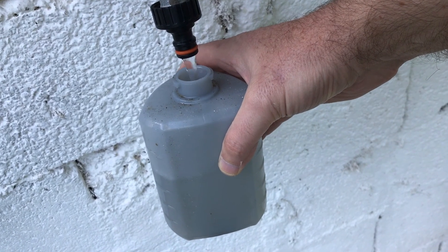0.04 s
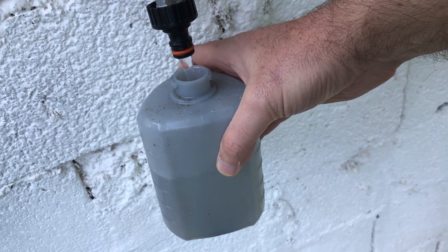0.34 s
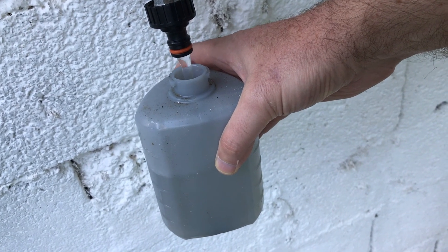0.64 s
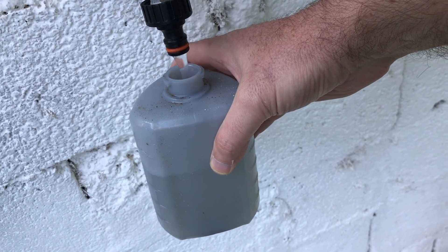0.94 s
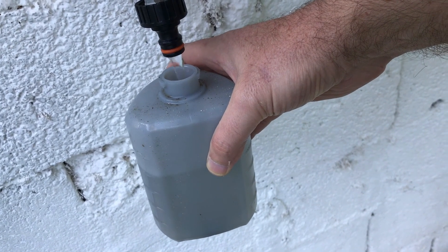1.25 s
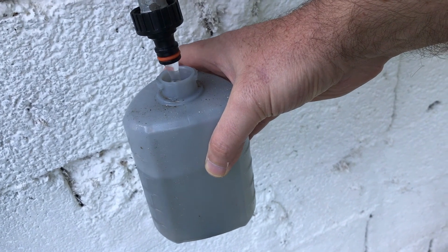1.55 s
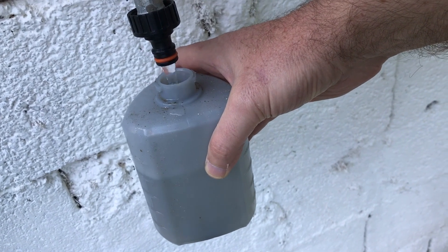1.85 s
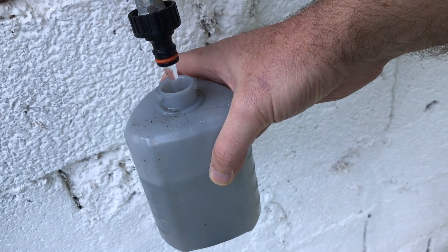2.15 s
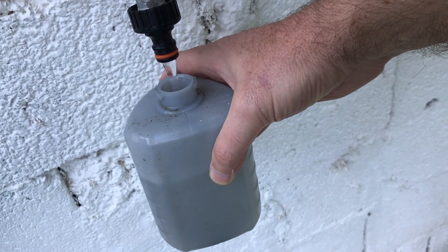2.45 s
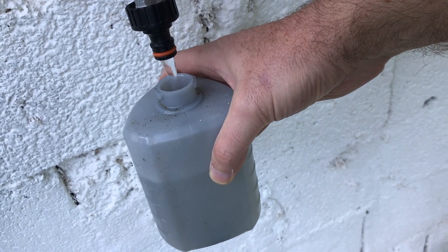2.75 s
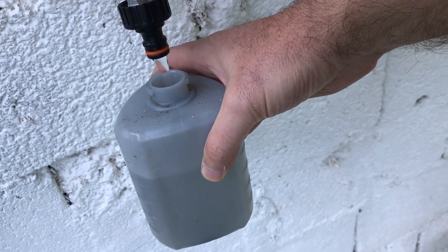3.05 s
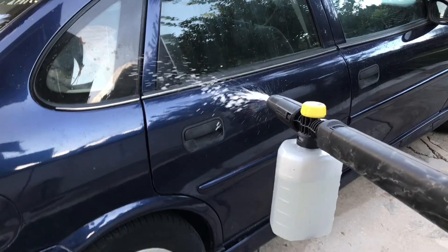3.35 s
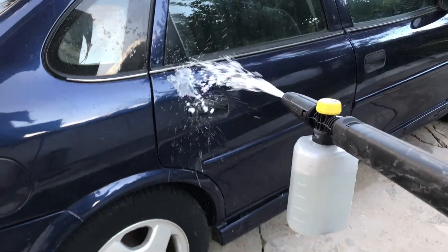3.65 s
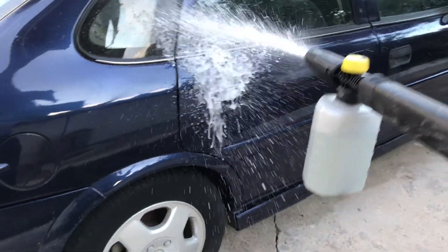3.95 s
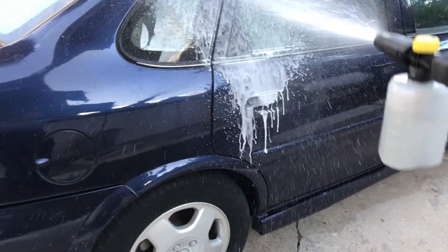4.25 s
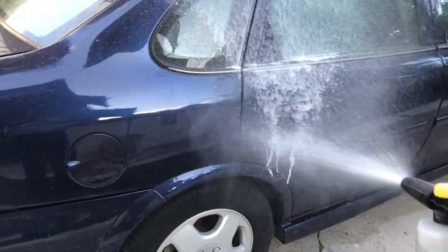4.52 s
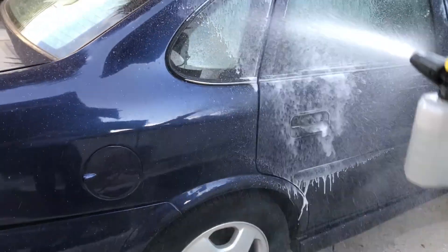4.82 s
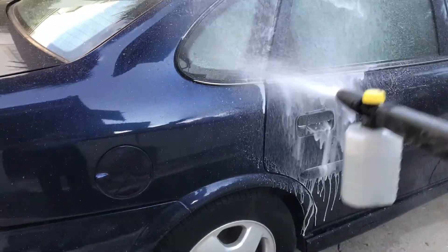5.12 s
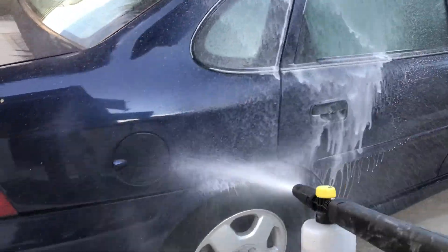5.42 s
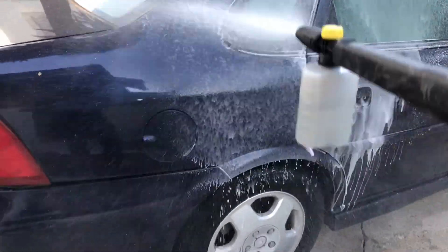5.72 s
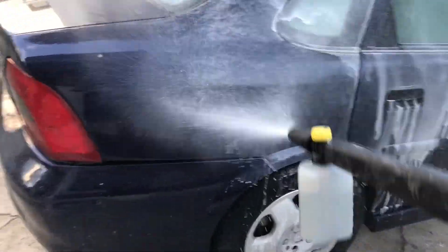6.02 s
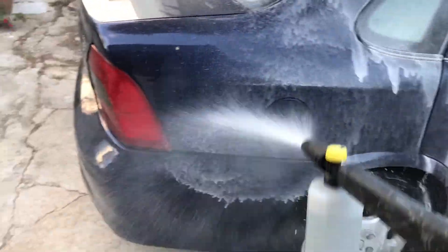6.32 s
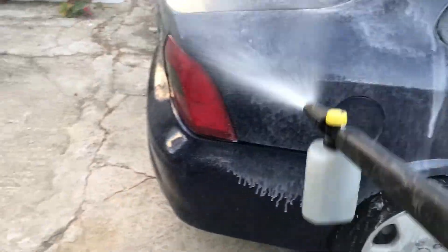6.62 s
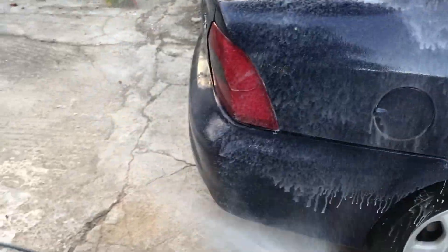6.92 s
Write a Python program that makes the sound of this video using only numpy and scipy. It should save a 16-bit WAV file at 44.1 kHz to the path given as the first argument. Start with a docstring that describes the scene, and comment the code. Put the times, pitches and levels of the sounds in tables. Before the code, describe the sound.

For the first three seconds, a garden hose runs into a plastic bottle with a soft, bright, fluttering hiss, over faint outdoor rumble and distant traffic. A cluster of small hollow plops comes between 1.4 and 2 seconds, with one more near 3.1. At about 3.25 seconds the sound cuts abruptly to a pressure washer. Its nozzle spits air, squeaks briefly, cracks and sputters foam while the pump begins a low drone. At 3.9 seconds it chokes for an instant, then opens into a loud, full jet. The hiss has a high ring and a sweeping, phasing tone as it moves over a car, drumming on the panels. From 4.6 seconds a wet splash builds, with a soft metal boom around 5.3. Near 6.5 seconds the ring swoops down and back up, and the spray continues until the end, just past seven seconds.

```python
"""Outdoors, over faint far traffic, a garden hose hisses and water plops into a plastic bottle.
At 3.25 s a hard cut leads to a pressure washer: its foam lance spits trapped air as the pump starts to drone.
The lance squeaks, cracks, sputters foam and chokes, then opens to a full jet at 3.9 s.
The jet sweeps a car: panels drum, and the hiss rings and phases against its bounce off the ground.
From 4.6 s the nozzle closes in and a splash joins; near the end the ring swoops over the rear corner."""
import sys
import numpy as np
from scipy import signal
from scipy.fft import rfft, irfft, next_fast_len
from scipy.io import wavfile
from scipy.ndimage import uniform_filter1d, map_coordinates

SR = 44100
rng = np.random.default_rng(int(sys.argv[2]) if len(sys.argv) > 2 else 0)


def inscribe(sig):
    """Save sig as 16-bit PCM at rate SR to the path in sys.argv[1].

    A 1-D sig is mono; a 2-D sig holds one channel per row.
    Samples are clipped to [-1, 1] before scaling.
    """
    pcm = np.round(np.clip(np.atleast_2d(sig).T, -1, 1) * 32767)
    wavfile.write(sys.argv[1], SR, pcm.astype(np.int16))


N = 316197
TIME = np.arange(N) / SR
FILL_END_S, WASH_START_S = 3.246, 3.266
CLOSE_IN_S, CLOSE_IN_TAKES_S = 4.6, 1.3  # the nozzle nears the rear of the car


def gain_of(db):
    """Decibels to gain."""
    return np.exp(np.asarray(db) * (np.log(10) / 20))


def unit_rms(x):
    """Scales x to rms 1."""
    return x / np.sqrt(np.mean(x ** 2) + 1e-20)


def swell(s, half_s):
    """A smooth bump of height 1 around a moment."""
    return np.exp(-((TIME - s) / half_s) ** 2)


def fade_in(s, rise_s):
    """A ramp from 0 to 1, starting at s."""
    return np.clip((TIME - s) / rise_s, 0, 1)


def since(s):
    """Seconds since s, zero before it."""
    return np.maximum(TIME - s, 0)


def automation(rows):
    """One curve for each column after the time column."""
    s, *columns = np.transpose(rows)
    return [np.interp(TIME, s, column) for column in columns]


def eq(x, points):
    """Shapes x with an EQ curve, at rms 1."""
    f, db = np.transpose(points)
    size = next_fast_len(N, real=True)
    hz = np.fft.rfftfreq(size, 1 / SR)
    response = gain_of(np.interp(np.log(hz + 1), np.log(f), db))
    return unit_rms(irfft(rfft(x, size) * response, size)[:N])


def delayed(x, ms):
    """x heard along a longer path, whose lag may move."""
    return map_coordinates(x, [(TIME - ms / 1000) * SR], order=3)


def wander(rate_hz):
    """A random modulator at rms 1, moving at up to about rate_hz."""
    knots = rng.standard_normal(8000)
    return unit_rms(np.interp(TIME * 2 * rate_hz, np.arange(len(knots)), knots))


def turbulence(patchy_db, drift_db):
    """White noise with quick, broad patches of level and narrow ones that linger."""
    def patches(bins, frames):
        across_pitch = uniform_filter1d(rng.standard_normal(spectra.shape), bins, axis=0)
        return unit_rms(uniform_filter1d(across_pitch, frames, axis=1))

    spectra = signal.stft(rng.standard_normal(N), nperseg=512)[2]
    level_db = patchy_db * patches(bins=14, frames=2) + drift_db * patches(bins=3, frames=18)
    return unit_rms(signal.istft(spectra * gain_of(level_db), nperseg=512)[1][:N])


def drops(per_s, spread_db):
    """Random impacts, most small and a few large."""
    size = gain_of(spread_db * np.minimum(rng.exponential(1, N), 4))
    return unit_rms(size * rng.choice([-1, 1], N) * (rng.random(N) < per_s / SR))


def ring(hz, width_hz):
    """Noise in a steep resonance that may move, at rms 1."""
    pole = np.exp(-np.pi * width_hz / SR)
    slow = signal.lfilter([1 - pole], [1, -2 * pole, pole * pole], rng.random(N) - .5)
    phase = np.float32(2 * np.pi * (np.cumsum(np.broadcast_to(hz / SR, N)) % 1))
    return unit_rms(slow * np.cos(phase) + slow[::-1] * np.sin(phase))


AIR_EQ = [(12, -57), (20, -29), (25, -13), (36, -6.5), (91, -1.5), (123, -6), (229, -11.5), (258, -15),
          (375, -20), (505, -24), (700, -25.5), (910, -51), (1540, -120)]  # low end of the open air: f/Hz, gain/dB
TRAFFIC_EQ = [(350, -28), (650, -10), (950, -0.5), (1300, -2.5), (1700, -8.5), (2600, -15.5), (4000, -47)]  # midrange wash of far traffic: f/Hz, gain/dB
TRAFFIC_FADER = [(0, -53), (.8, -53), (1.6, -55), (2.2, -56.5), (3.2, -56)]  # the traffic eases off: t/s, level/dB


def outdoors():
    """The ambience bed: open-air rumble and far traffic."""
    traffic_db, = automation(TRAFFIC_FADER)
    air = gain_of(-45) * eq(rng.standard_normal(N), AIR_EQ)
    return air + gain_of(traffic_db) * eq(turbulence(patchy_db=.6, drift_db=1.2), TRAFFIC_EQ)


HOSE_EQ = [(2000, -30), (2650, -11.5), (2850, -9), (4200, -8.5), (4900, -8), (5400, 0), (6500, -7),
           (7800, -0.5), (8400, -3.5), (10600, 0), (12100, -2), (12600, -10), (13300, 0), (15800, -5)]  # bright hiss of the connector: f/Hz, gain/dB
HOSE_MODES = [(2860, 150, -67.5), (3170, 75, -67.5), (3336, 90, -66.5), (3740, 140, -66.5),
              (4340, 80, -70.5), (5300, 200, -64.5), (5620, 200, -60.5), (5970, 120, -62.5),
              (6430, 50, -66.5), (6980, 300, -57), (7860, 200, -69), (9200, 330, -51), (9620, 400, -47),
              (10400, 480, -54), (11600, 50, -49.5), (11760, 400, -51), (15450, 80, -59)]  # its ringing cavities: f/Hz, width/Hz, level/dB


def hose():
    """Water cavitates in the half-open connector: a fluttering hiss rings its cavities, near a wall."""
    fizz = turbulence(patchy_db=1.5, drift_db=1.2) + .5 * drops(per_s=3000, spread_db=3.5)
    hiss = gain_of(-45) * eq(fizz, HOSE_EQ)
    whistles = sum(gain_of(db) * ring(hz, width) for hz, width, db in HOSE_MODES)
    flutter_db = .6 * wander(rate_hz=280) + .3 * wander(rate_hz=35)
    dip_db = -2 * swell(2.45, half_s=.035)
    direct = (hiss + whistles) * gain_of(dip_db + flutter_db)
    return direct + .21 * delayed(direct, ms=5.25)  # wall reflection


# water landing in the bottle: t/s, relative splash level/dB, splash f/Hz, relative knock level/dB
PLOP_CUES = [(1.439, -45, 2400, -48), (1.548, -37, 850, -33), (1.592, -40, 1350, -42),
             (1.626, -41, 2100, -38), (1.671, -43, 1250, -44), (1.785, -46, 1200, -43),
             (1.949, -47, 1550, -55), (3.105, -44, 700, -43)]


def plops(bottle_hz=387):
    """Each plop is a short splash and a knock of the air in the bottle."""
    out, t = np.zeros(N), np.arange(4000) / SR
    knock = np.sin(2 * np.pi * bottle_hz * t) * np.exp(-t / .0098)
    for s, splash_db, hz, knock_db in PLOP_CUES:
        band = signal.butter(2, [hz * .73, hz * 1.3], "band", fs=SR)
        splash = unit_rms(signal.lfilter(*band, rng.standard_normal(len(t)))) * np.exp(-t / .0085)
        out[round(s * SR):][:len(t)] += gain_of(splash_db) * splash + gain_of(knock_db) * knock
    return .5 * out


def lance_envelope(water_s=3.518, full_s=3.88):
    """Spray gain and mist share: trapped air spits, water gushes, pressure builds, the jet opens."""
    sag_db = -78 * since(WASH_START_S)
    release_db = -210 * since(WASH_START_S + .083)
    spit = gain_of(-30.5 + sag_db + release_db)
    dribble = gain_of(-51.5)
    gush = gain_of(-42 - 62 * since(water_s))
    choke_db = -8.5 * swell(full_s, half_s=.027)
    build = gain_of(-21.5 - 67 * np.maximum(full_s - TIME, 0) + choke_db)
    opened = fade_in(full_s, rise_s=.019)
    full_jet = gain_of(-19.95 + 1.55 * fade_in(CLOSE_IN_S, CLOSE_IN_TAKES_S))
    foam_power = (1 - opened) * (dribble ** 2 + fade_in(water_s, rise_s=.004) * (gush ** 2 + build ** 2))
    mist_power = spit ** 2 + opened * full_jet ** 2
    power = foam_power + mist_power
    return np.sqrt(power), np.clip(mist_power / power, .044, 1)  # some water always blows to mist


JET_EQ = [(350, -20.5), (550, -1.5), (900, 0), (1300, -1.5), (2200, -2.5), (3000, 0.5), (4300, 1),
          (4900, -0.5), (6500, 1), (7900, -1.5), (9400, 2), (10400, -2.5), (11600, 1.5), (15800, -4.5)]  # broad hiss of mist: f/Hz, gain/dB
FOAM_EQ = [(400, -12), (800, 5.5), (1800, -1), (2400, 0.5), (3100, 9.5), (4200, 9.5), (4700, -3), (5700, 8),
           (6900, 6), (7550, -2), (8200, 4.5), (9300, 3.5), (10700, -3), (15800, -3.5)]  # hollow sputter of foam: f/Hz, gain/dB
LANCE_MODES = [(3590, 140, -22), (7180, 400, -14), (9740, 540, -19.5)]  # resonances of the lance: f/Hz, width/Hz, relative level/dB


def spray():
    """The lance crossfades between sputtering foam and a jet of mist, which rings where it strikes."""
    gain, mist = lance_envelope()
    rush = turbulence(patchy_db=1, drift_db=1.53) + .4 * drops(per_s=6000, spread_db=3)
    jet = gain_of(2) * eq(rush, JET_EQ)
    sputter = turbulence(patchy_db=2.7, drift_db=2) + .5 * drops(per_s=2500, spread_db=4)
    foam = gain_of(3.5) * eq(sputter, FOAM_EQ)
    modes = sum(gain_of(db) * ring(hz, width) for hz, width, db in LANCE_MODES)
    return gain * (np.sqrt(mist) * (jet + strike_ring()) + np.sqrt(1 - mist) * foam + modes)


# the struck spot: t/s, ring f/Hz, relative ring level/dB, overtone f/Hz, relative overtone level/dB
STRIKE_TONES = [(3.27, 3510, -12, 5900, -27), (3.98, 3630, -8, 5890, -11), (4.35, 3518, -6, 5830, -16.5),
                (4.85, 3620, -10, 5800, -15), (5.45, 3665, -7, 5960, -11), (5.79, 3550, -2.8, 5680, -12),
                (5.95, 3640, -7, 5910, -7), (6.42, 3845, -9, 5610, -14), (6.56, 3634, -8.5, 5700, -24),
                (6.72, 3632, -10.5, 5750, -14), (6.92, 3617, -10.5, 5750, -13), (7.1, 3900, -9, 5950, -13)]
CORNER_SWOOP = [(6.485, 0, 1), (6.518, -130, 8), (6.548, -880, 7), (6.578, -1140, -5), (6.618, -1000, 4.5),
                (6.646, -300, 7), (6.68, -600, 0), (6.735, -340, 9), (6.78, 0, 1)]  # dive and return over the car's rear corner: t/s, shift/Hz, gain/dB


def strike_ring():
    """The spot under the jet rings in two bands that waver together, as it never holds still."""
    ring_hz, ring_db, overtone_hz, overtone_db = automation(STRIKE_TONES)
    shift_hz, swoop_db = automation(CORNER_SWOOP)
    bent_hz = (ring_hz + shift_hz) * (1 + .018 * wander(rate_hz=16))
    core = .68 * ring(bent_hz, width_hz=340) + .66 * ring(bent_hz * .98, width_hz=850)
    core *= gain_of(ring_db + wander(rate_hz=18))
    overtone = ring(overtone_hz + bent_hz - ring_hz, width_hz=383)
    overtone *= gain_of(overtone_db + 1.6 * wander(rate_hz=14))
    return gain_of(swoop_db) * (core + overtone)


# turning points of the hand; the ground bounce lags more as the nozzle lifts: t/s, lag/ms
HAND_SWEEPS = [(3.8, 3.56), (4.07, 3.78), (4.57, 3.04), (4.85, 3.21), (5.36, 2.48), (5.75, 2.76),
               (6.11, 2.37), (6.47, 2.57), (6.71, 2.25), (6.88, 2.3), (7.08, 2.18)]


def ground_phasing(direct):
    """A bounce off the concrete and a later one via the car's side comb the jet as the hand sweeps."""
    s, lags_ms = np.transpose(HAND_SWEEPS)
    turns = np.arange(len(s))
    sweep, progress = np.divmod(np.interp(TIME, s, turns), 1)
    eased = np.sin(np.pi / 2 * progress) ** 2
    lag_ms = np.interp(sweep + eased, turns, lags_ms)
    bounce = signal.lfilter([.85, .15], [1], direct)  # rough ground dulls it
    return direct + .27 * delayed(bounce, lag_ms) + .11 * delayed(bounce, lag_ms + 2.2)


PISTON_ORDERS = [(1, -53), (2, -50), (3, -53), (4, -48), (5, -47), (6, -43), (7, -47), (8, -54), (9, -53),
                 (11, -42.5), (12, -43.5), (15, -39)]  # the drone's partials: multiple of shaft speed, relative level/dB
HUM_PARTIALS = [(100, -46), (200, -46)]  # mains hum of the motor: f/Hz, relative level/dB
RUMBLE_FADER = [(3.27, -41), (3.42, -34), (6.4, -33.5), (7.17, -29)]  # rumble of machine and yard: t/s, relative level/dB
RUMBLE_EQ = [(20, -28), (35, -8), (55, 1), (110, 3), (160, -2.5), (240, -3), (380, -3), (470, -14),
             (800, -25.5)]  # tone of that rumble: f/Hz, gain/dB


def pump(idle_hz=50, loaded_hz=46.73):
    """Under load the shaft slows, the piston strokes harden and the hum surges, over a rough rumble."""
    shaft_hz = loaded_hz + (idle_hz - loaded_hz) * np.exp(-since(3.78) / .6)
    turns = np.cumsum(shaft_hz * (1 + .0015 * wander(rate_hz=6))) / SR
    soft_db, hard_db = -16, 1.26
    load_db = hard_db + (soft_db - hard_db) * np.exp(-since(WASH_START_S) / .89)
    surge_db = -2 + 5.5 * swell(3.88, half_s=.37)
    strokes, hum = np.zeros((2, N))
    for order, db in PISTON_ORDERS:
        hardness = np.sqrt(order / 5)  # load sharpens the strokes, so high orders gain most
        gain = gain_of(db + hardness * load_db + 1.5 * wander(rate_hz=5))
        strokes += gain * np.sin(2 * np.pi * (order * turns + rng.random()))
    for hz, db in HUM_PARTIALS:
        gain = gain_of(db + surge_db + 1.4 * wander(rate_hz=3))
        hum += gain * np.sin(2 * np.pi * (hz * TIME + rng.random()))
    rumble_db, = automation(RUMBLE_FADER)
    rumble = gain_of(rumble_db - 2.5) * eq(rng.standard_normal(N), RUMBLE_EQ)
    shudder = gain_of(-36) * swell(3.52, half_s=.15) * ring(120, width_hz=80)  # the hose fills
    return np.sqrt(2) * (strokes + hum) + rumble + shudder


PANEL_DRUM = [(3.32, -34, 652), (3.42, -45.5, 642), (3.79, -43.5, 655.8), (3.885, -29, 685),
              (4.3, -28, 695), (4.64, -28.8, 662), (4.87, -23.8, 668), (5.13, -23.6, 720),
              (5.27, -27.5, 710), (5.83, -26, 686.7), (6.0, -34.5, 695), (6.42, -28, 712), (6.68, -29, 660),
              (6.82, -34.5, 775)]  # doors and windows under the jet: t/s, level/dB, f/Hz


def car_panels():
    """The jet drums on the panels: one gliding resonance and a patter of drops."""
    level_db, hz = automation(PANEL_DRUM)
    patter_eq = [(400, -35), (560, -3), (800, -.5), (1200, -5), (2200, -7.5), (5000, -23.5)]
    patter = gain_of(-5.5) * eq(drops(per_s=4000, spread_db=2), patter_eq)
    body = gain_of(-1.5) * ring(hz, width_hz=138)
    return gain_of(level_db + 1.1 * wander(rate_hz=25)) * (body + patter)


def air_squeak():
    """The last of the air squeaks out of the nozzle."""
    return gain_of(-38) * swell(3.394, half_s=.02) * ring(3470, width_hz=650)


SLUG_CUES = [(3.52, -23), (3.536, -21), (3.548, -26)]  # slugs of water bursting out: t/s, relative level/dB


def water_slugs():
    """Short cracks as water follows the trapped air out of the nozzle."""
    bursts = sum(gain_of(db) * (TIME > s) * np.exp(-since(s) / .0024) for s, db in SLUG_CUES)
    return .5 * bursts * eq(rng.standard_normal(N), FOAM_EQ)


SPLASH_EQ = [(700, -21), (1200, -1), (2100, -0.5), (3200, -16), (6000, -35)]  # wet midrange of water on the car: f/Hz, gain/dB


def close_splash():
    """A splash fades in as the nozzle closes in on the car."""
    splash = eq(turbulence(patchy_db=2.5, drift_db=3), SPLASH_EQ)
    return gain_of(-30.8) * fade_in(CLOSE_IN_S, CLOSE_IN_TAKES_S) * splash


def wing_boom():
    """The rear wing booms once under the jet."""
    return gain_of(-35.5) * swell(5.33, half_s=.076) * ring(229, width_hz=16)


def scene():
    """Bottle filling, a hard cut, then the car wash, the same in both ears."""
    cut = np.clip((FILL_END_S - TIME) / .002, 0, 1)
    filling = (outdoors() + hose() + plops()) * cut
    nozzle = ground_phasing(spray() + air_squeak() + water_slugs())
    car = car_panels() + close_splash() + wing_boom()
    washing = (nozzle + pump() + car) * fade_in(WASH_START_S, rise_s=.021)
    return np.tile(filling + washing, (2, 1))


def record(dry):
    """Master EQ: a bass roll-off, then a steep high cut."""
    low_cut = signal.butter(3, 32, "high", fs=SR, output="sos")
    high_cut = signal.firwin(1601, 15780, window=("kaiser", 9), fs=SR)
    return signal.oaconvolve(signal.sosfilt(low_cut, dry), high_cut[None], "same")


dry = scene()
out = record(dry)
inscribe(out)
```